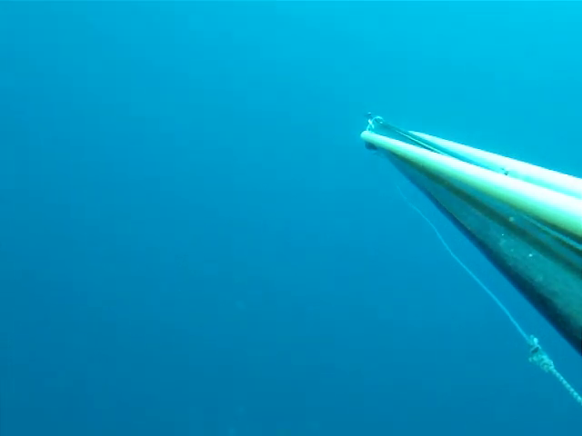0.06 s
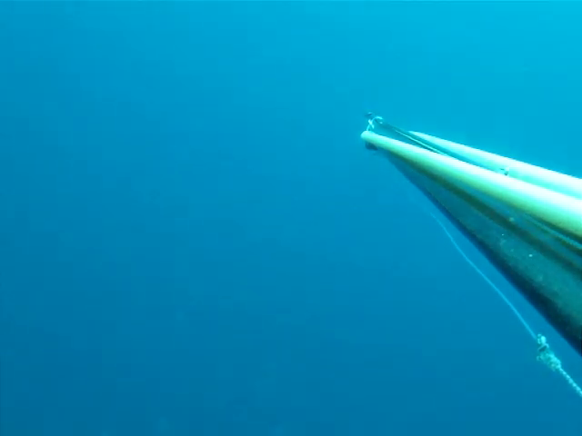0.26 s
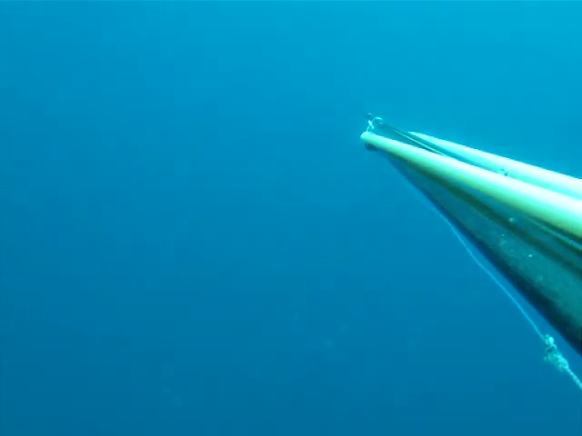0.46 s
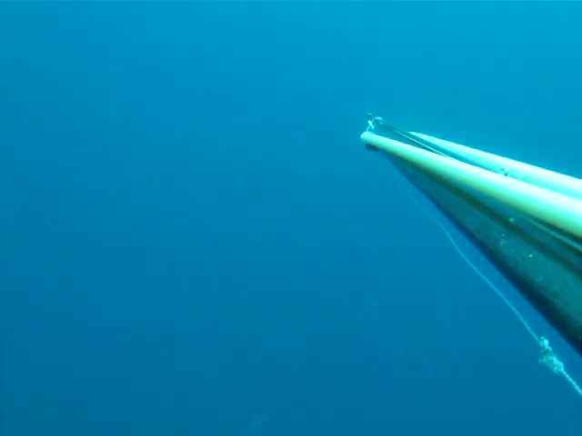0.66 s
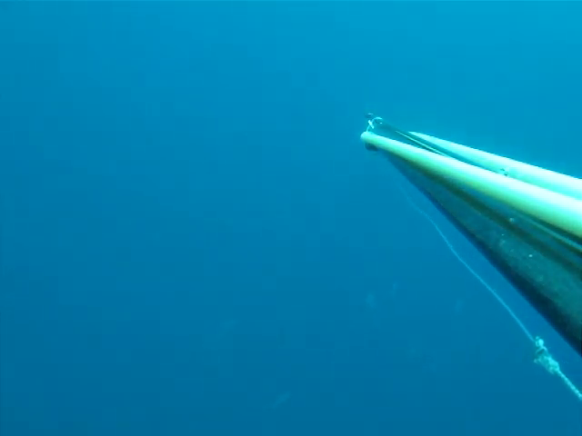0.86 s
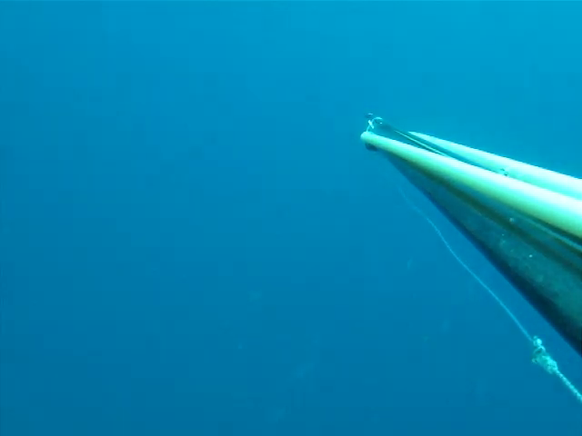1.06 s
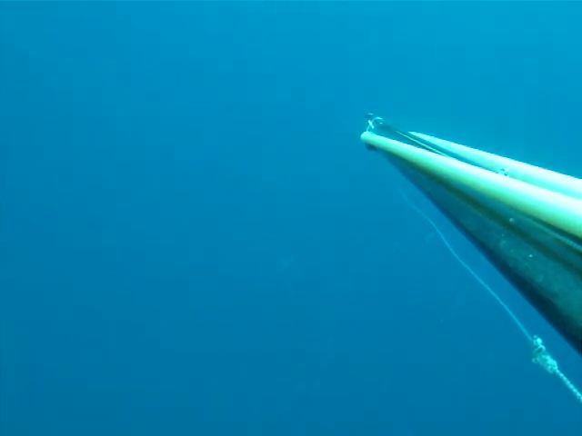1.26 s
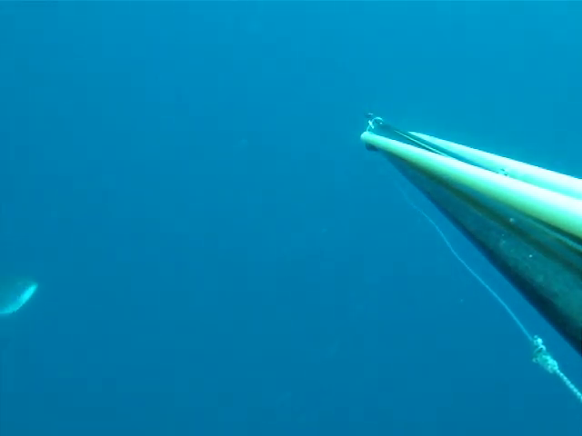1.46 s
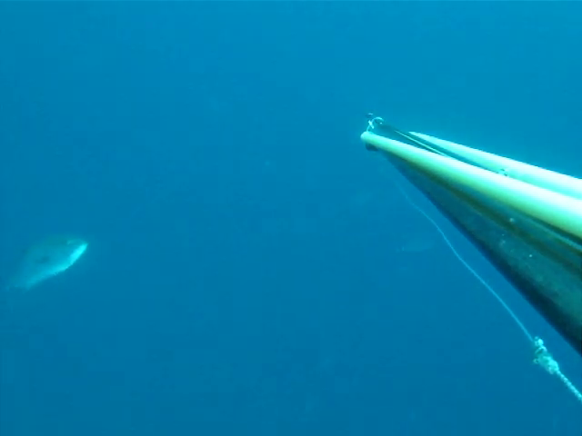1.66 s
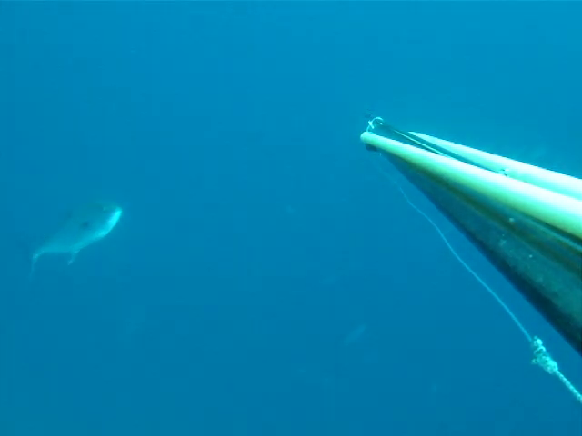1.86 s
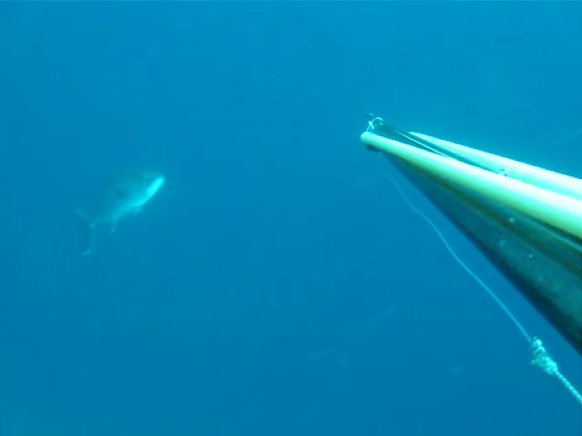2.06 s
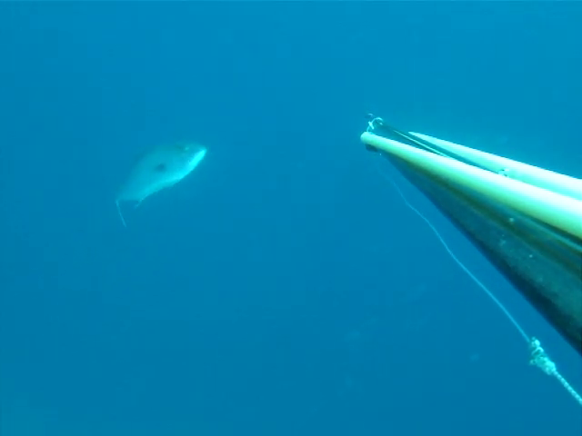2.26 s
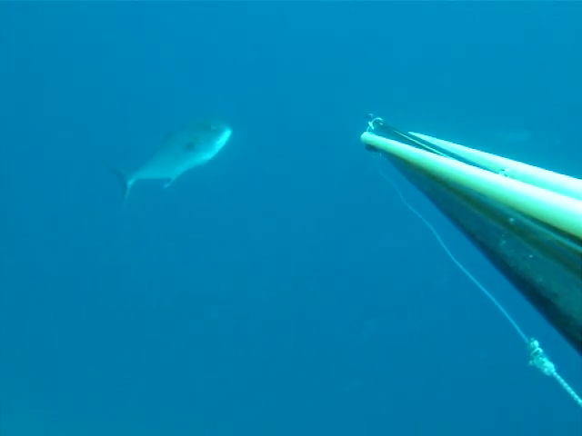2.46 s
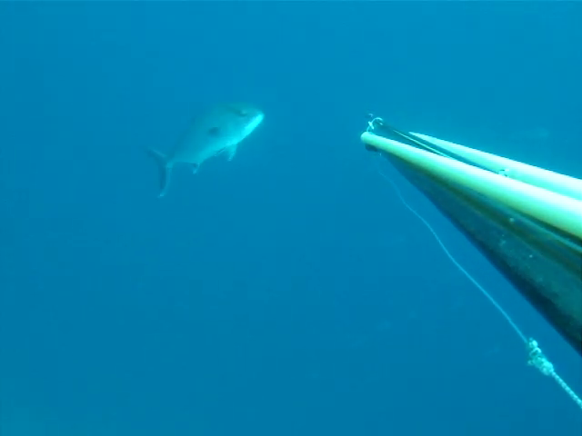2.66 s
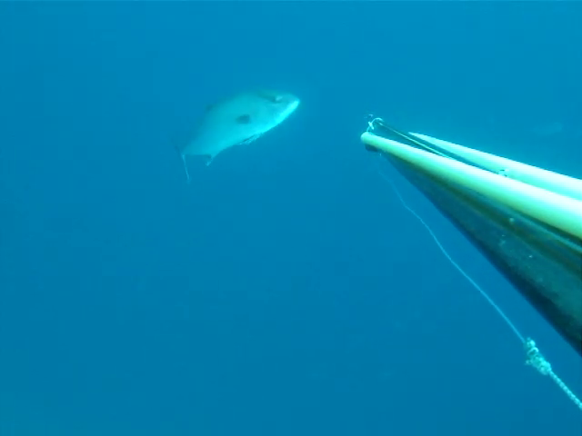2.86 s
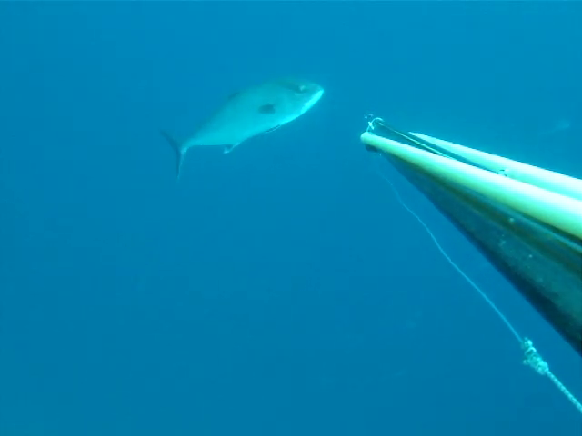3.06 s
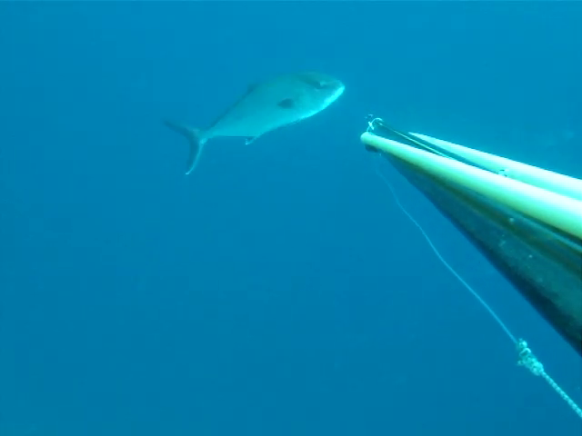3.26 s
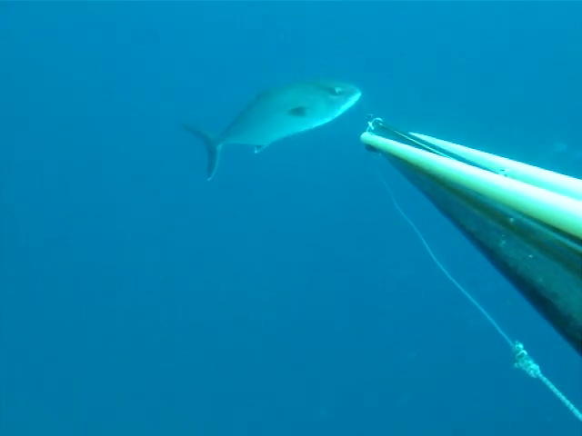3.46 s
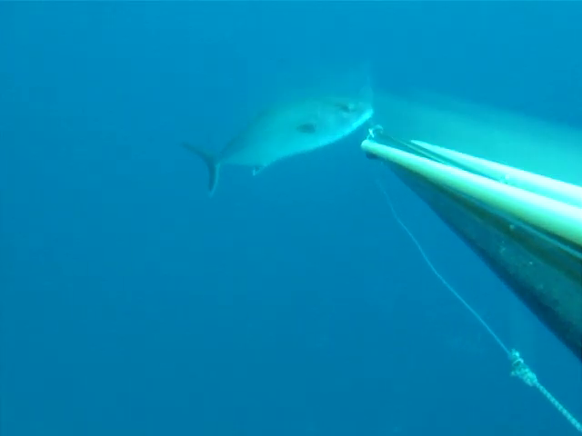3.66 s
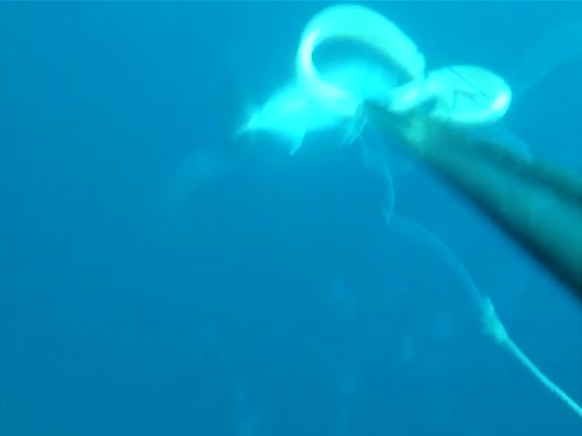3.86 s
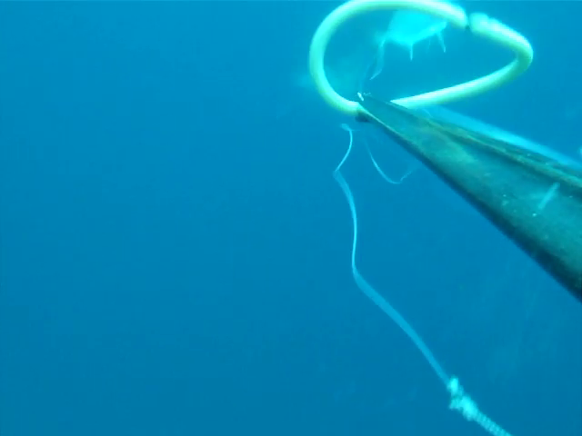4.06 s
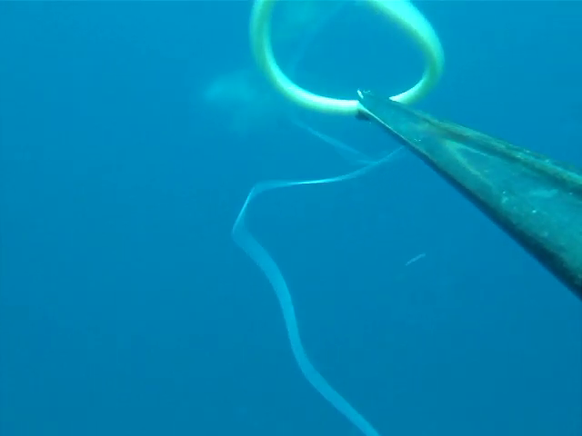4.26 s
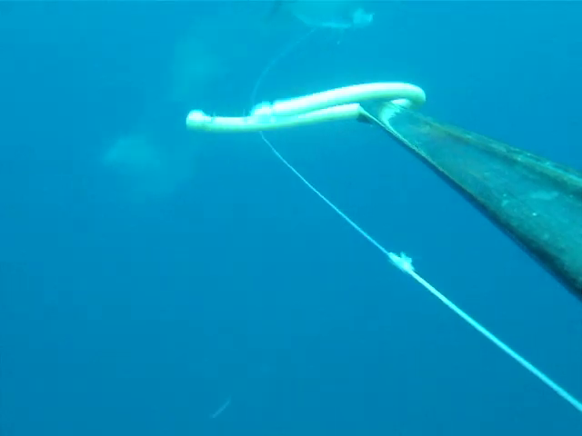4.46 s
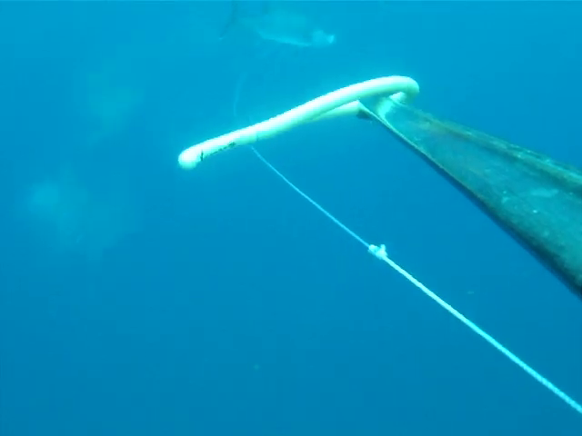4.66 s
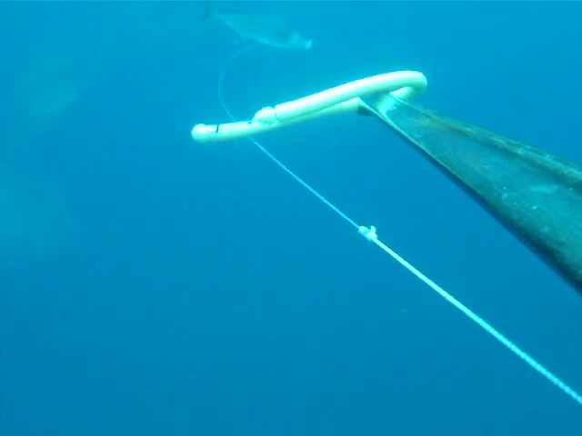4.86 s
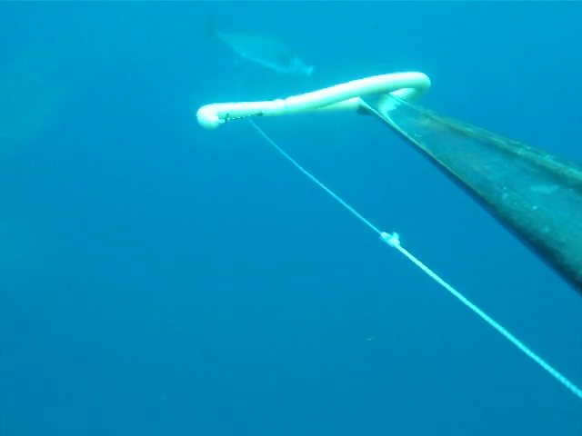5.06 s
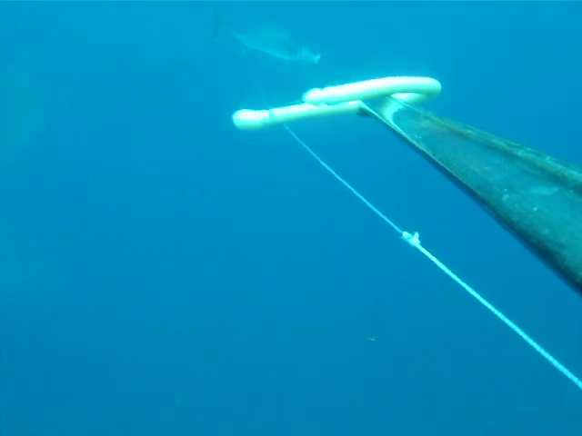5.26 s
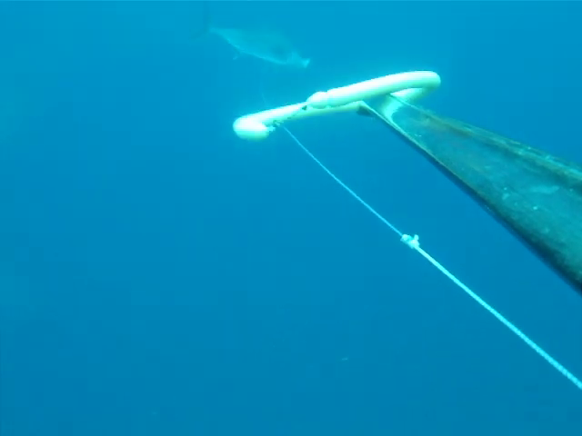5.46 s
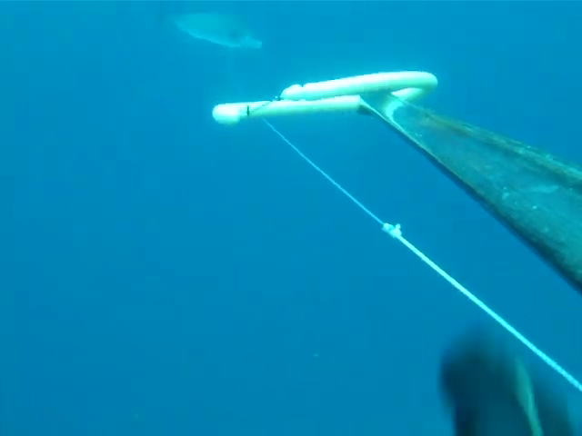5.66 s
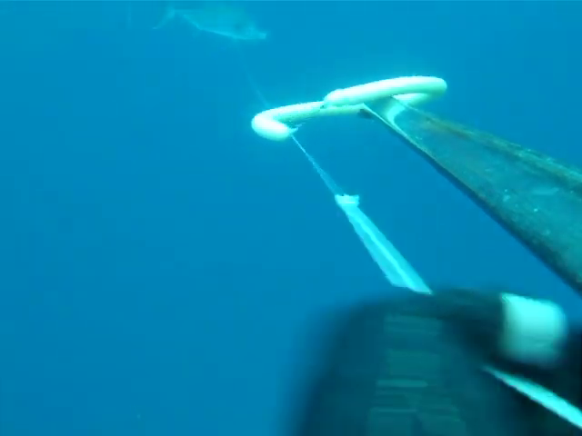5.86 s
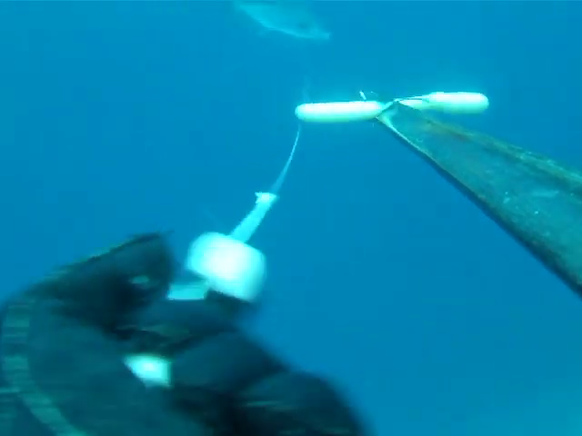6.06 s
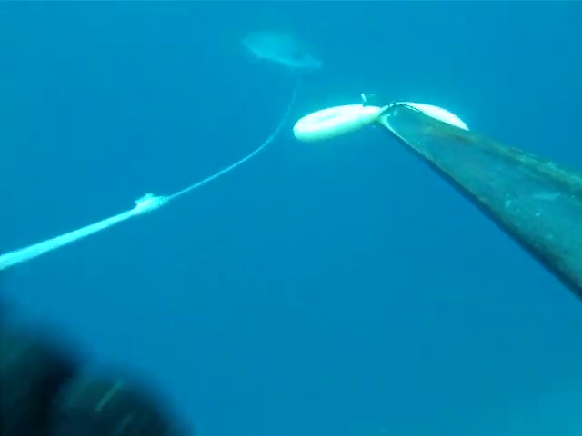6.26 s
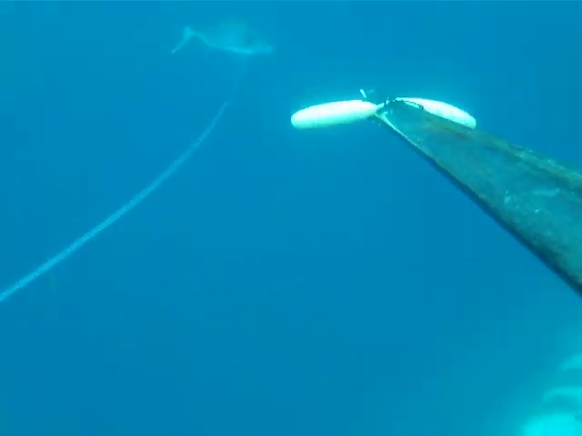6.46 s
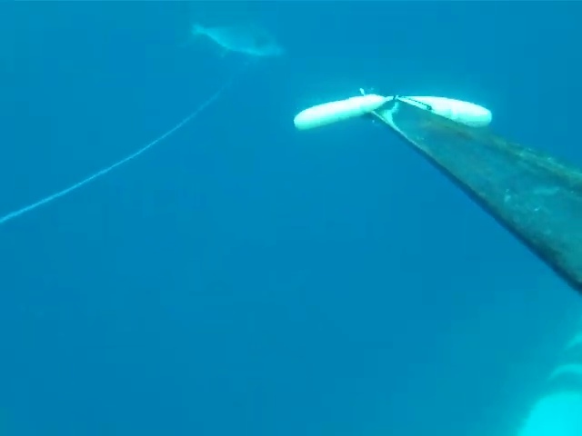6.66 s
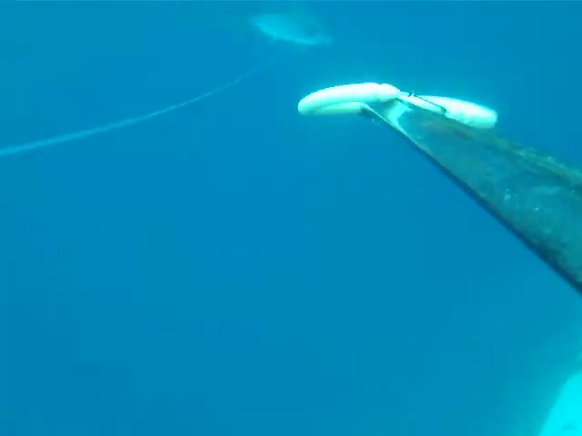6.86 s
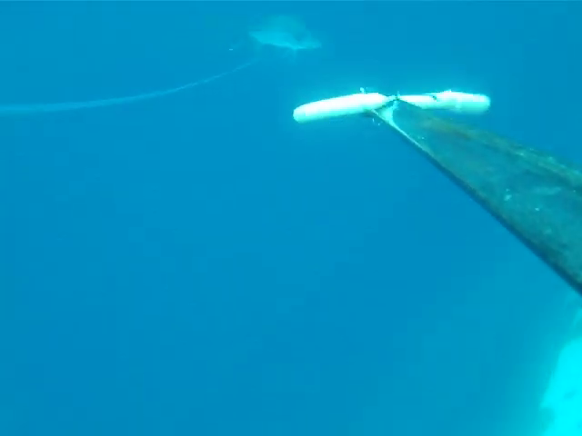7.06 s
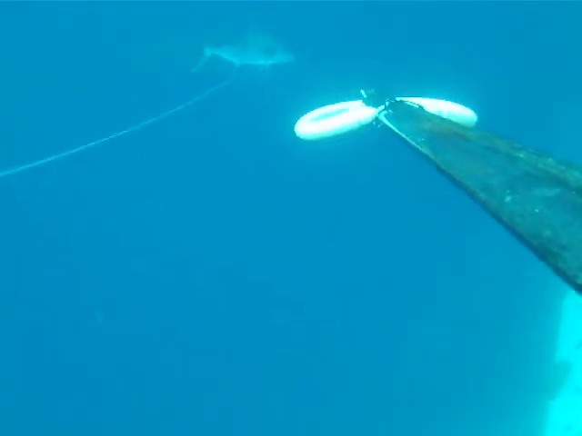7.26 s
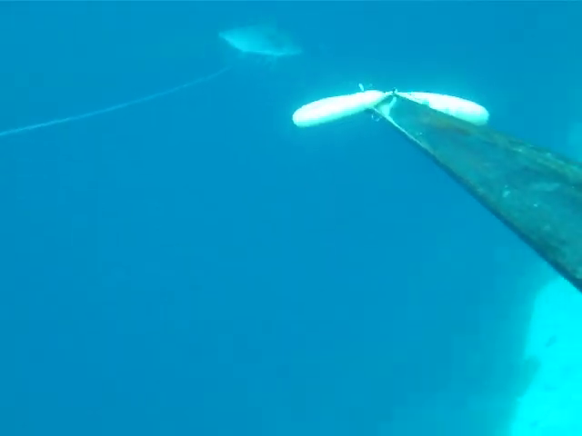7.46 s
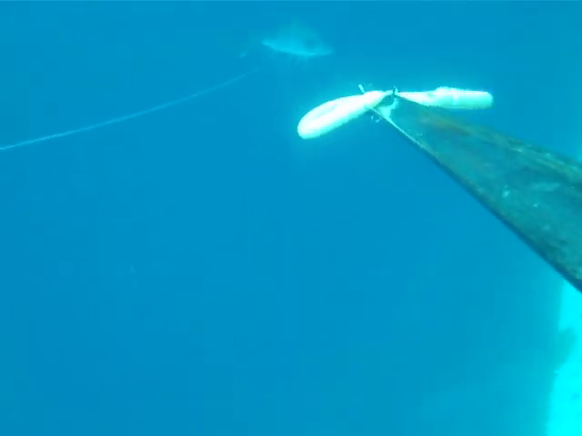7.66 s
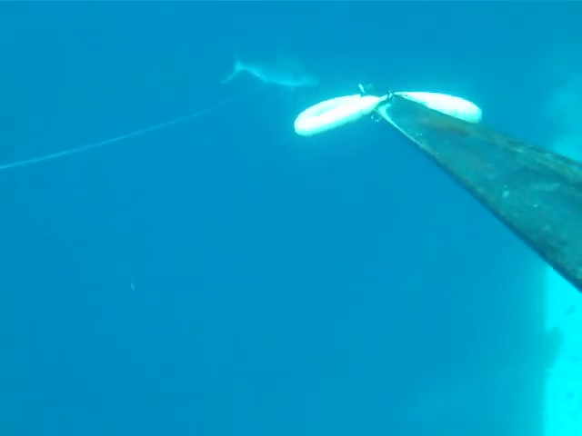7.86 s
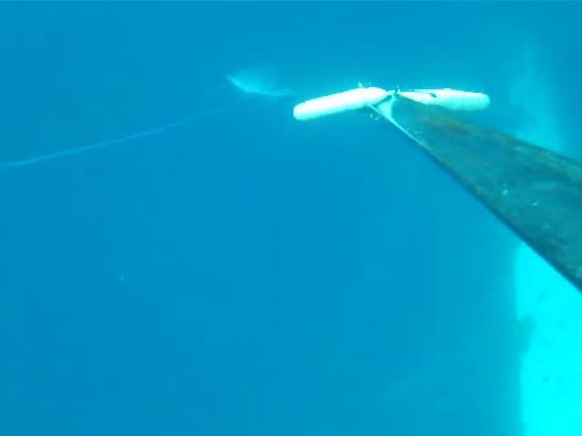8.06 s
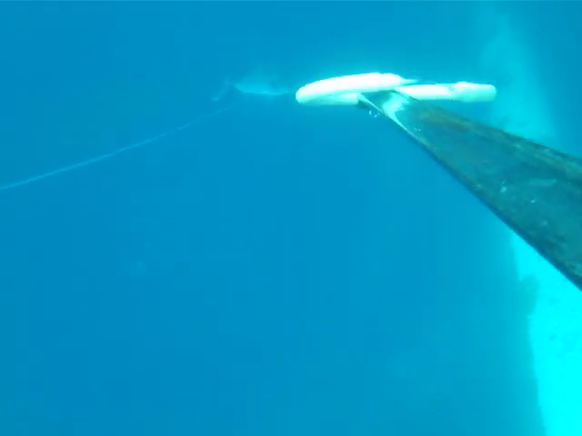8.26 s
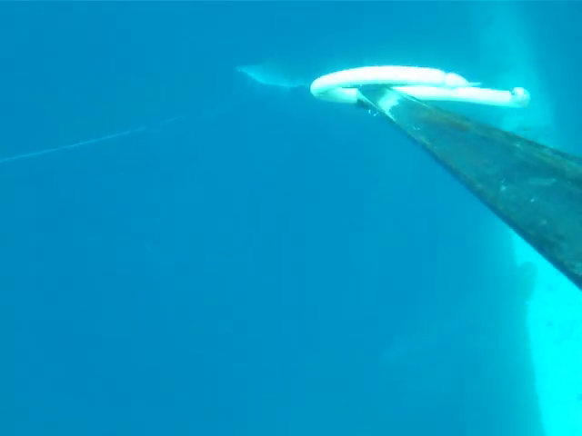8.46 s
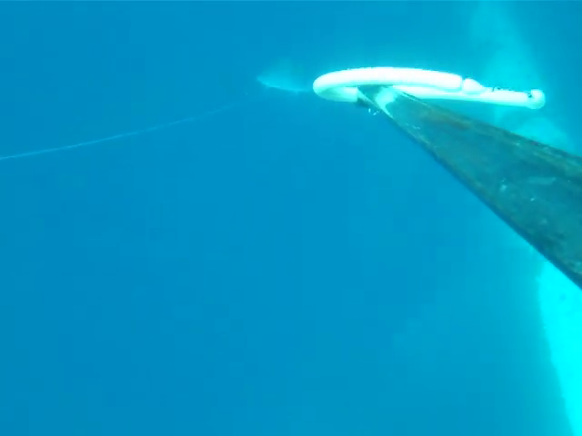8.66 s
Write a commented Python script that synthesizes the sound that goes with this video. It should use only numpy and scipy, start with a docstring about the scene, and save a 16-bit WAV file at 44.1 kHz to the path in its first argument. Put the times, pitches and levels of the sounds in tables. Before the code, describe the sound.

Underwater, with a dull narrow-band microphone mounted on the gun: near silence over low hiss and thin whine, broken by soft knocks and a bright mechanical click. A hard, clipping shot booms and quickly decays into rumble and slapping. A later bright clack brings rattling and fading rubbing. Then hand and line bump the barrel, followed by bouts of low groaning buzz, small squeaks, dull taps and clicks to the end.

```python
"""A band-powered speargun fires under water, heard through a sealed housing fixed to the gun.
Catch, shot, slapping bands, the line jerking tight and rubbing: noise forces ring the same barrel modes.
Ticks, ringing parts and the slow recoil swing are dying sines; the taut line hums and squeaks as near-sines.
A low rumble of churned water follows the shot; hiss and thin whines lie under it all.
The recoil overloads the recorder, which clips hard."""
import sys
import numpy as np
from scipy import signal
from scipy.fft import rfft, irfft
from scipy.io import wavfile
from scipy.ndimage import uniform_filter1d

SR = 44100
rng = np.random.default_rng(int(sys.argv[2]) if len(sys.argv) > 2 else 0)


def output_pcm(signal):
    """Save a mono or channel-first signal as 16-bit PCM at the path in sys.argv[1].

    Samples are clipped to [-1, 1] before scaling.
    """
    pcm = np.clip(np.atleast_2d(signal).T, -1, 1) * 32767
    wavfile.write(sys.argv[1], SR, np.round(pcm).astype(np.int16))


N = 384895


def amp(db):
    """Gain of a level in dB."""
    return 10 ** (np.asarray(db) / 20)


def rms_one(x):
    """Scaled to rms 1."""
    return x / np.sqrt(np.mean(x ** 2) + 1e-20)


def above(x, hz):
    """Fourth-order high-pass."""
    return signal.sosfilt(signal.butter(4, hz, "high", fs=SR, output="sos"), x)


def stretch(rows):
    """Sample range of a curve table and its columns interpolated over that range."""
    s, *columns = np.transpose(rows)
    at = np.arange(round(s[0] * SR), min(round(s[-1] * SR), N))
    return at, [np.interp(at / SR, s, column) for column in columns]


def drift(rate_hz):
    """Slow chance: noise twice through a one-pole low-pass; rms 1."""
    r = np.exp(-2 * np.pi * rate_hz / SR)
    slow = signal.lfilter([1], [1, -2 * r, r * r], rng.standard_normal(N + SR))
    return rms_one(slow[SR:])  # filter start-up dropped


def body(x, modes):
    """Parallel resonances with alternating signs; noise of rms 1 comes out near rms 1."""
    out, power = 0, 0
    for k, (hz, width_hz, db) in enumerate(modes):
        r = np.exp(-np.pi * width_hz / SR)
        b = amp(db) * (-1) ** k * (1 - r * r) / 2 * np.array([1, 0, -1])
        a = [1, -2 * r * np.cos(2 * np.pi * hz / SR), r * r]
        out = out + signal.lfilter(b, a, x + 1e-18)
        power += amp(2 * db) * np.pi * width_hz / SR
    return out / np.sqrt(power)


# Hiss spectrum: (frequency [Hz], relative density [dB per Hz])
HISS_SPECTRUM = [(8.8, -28.5), (15, 1.5), (49, -18), (87, -15.5), (340, -17.5), (399, -16.5), (444, -19),
                 (1130, -22), (3460, -24), (3950, -24), (7110, -24), (7910, -22.5), (8800, -15),
                 (11400, -77), (19400, -120)]
# Electronics whine: (frequency [Hz], level [dB rms])
WHINE_TONES = [(3047, -73), (3871, -70), (3989, -72), (4021, -70), (7827, -74), (7860, -66), (7887, -67),
               (7919, -75), (8113, -70), (8140, -70)]
HISS_DB_RMS = -51


def recorder_noise():
    """Noise shaped by a smooth spectrum, plus steady thin tones."""
    hz, db = np.transpose(HISS_SPECTRUM)
    grid_hz = np.maximum(np.fft.rfftfreq(N, 1 / SR), 1)
    gain = amp(np.interp(np.log(grid_hz), np.log(hz), db))
    hiss = irfft(rfft(rng.standard_normal(N)) * gain, N)
    t = np.arange(N) / SR
    whine = np.zeros(N)
    for tone_hz, tone_db in WHINE_TONES:
        whine += np.sqrt(2) * amp(tone_db) * np.sin(2 * np.pi * (tone_hz * t + rng.random()))
    return amp(HISS_DB_RMS) * rms_one(hiss) + whine


WASH_S, WASH_DB_RMS, WASH_T60_S, WASH_BAND_HZ = 3.735, -18.5, 0.38, [25, 112]  # level at onset


def wash():
    """Churned water round the housing: low band noise dying after the shot."""
    age = np.arange(N) / SR - WASH_S
    band = signal.butter(2, WASH_BAND_HZ, "band", fs=SR, output="sos")
    rumble = rms_one(signal.sosfilt(band, rng.standard_normal(N)))
    return rumble * amp(WASH_DB_RMS - 60 * np.maximum(age, 0) / WASH_T60_S) * (age > 0)


# Line squeaks: (start [s], fastest [s], end [s], top pitch [Hz], level at rest pitch [dB rms])
LINE_SQUEAKS = [(5.955, 5.96, 6.01, 680, -41), (6.05, 6.09, 6.15, 730, -45), (6.39, 6.514, 6.62, 1136, -42),
                (6.655, 6.66, 6.75, 774, -39), (7.27, 7.362, 7.44, 1215, -39), (7.45, 7.544, 7.6, 628, -39),
                (8.06, 8.14, 8.19, 745, -44), (8.335, 8.34, 8.39, 800, -42)]
SQUEAK_REST_HZ, SQUEAK_DB_PER_OCTAVE, SQUEAK_ARCH_POWER = 520, -7, 1.7


def squeaks(waver, flutter_db):
    """The line squeaks higher the faster it slides: a near-sine on a pitch arch, unsteady in level."""
    out, unsteady, flutter = np.zeros(N), drift(45), drift(27)
    for start_s, fastest_s, end_s, top_hz, db in LINE_SQUEAKS:
        at, (away,) = stretch([(start_s, 1), (fastest_s, 0), (end_s, 1)])
        octaves = np.log2(top_hz / SQUEAK_REST_HZ) * (1 - away ** SQUEAK_ARCH_POWER)
        hz = SQUEAK_REST_HZ * 2 ** octaves * (1 + waver * unsteady[at])
        phase = 2 * np.pi * np.cumsum(hz) / SR
        level = amp(db + SQUEAK_DB_PER_OCTAVE * octaves + flutter_db * flutter[at])
        out[at] += np.sqrt(2) * level * np.sin(phase) * signal.windows.tukey(len(at), .2)
    return out


# The fish's pull on the line, four bouts of: (time [s], hum level before flutter [dB rms], mean pitch [Hz])
PULL_BOUTS = [
    [(5.94, -45.5, 388), (5.972, -42.5, 368.6), (5.998, -38, 413), (6.026, -20.5, 368),
     (6.054, -36.5, 387.5), (6.082, -28, 393), (6.102, -26, 342), (6.126, -31, 390.6), (6.164, -34.5, 377),
     (6.176, -35.5, 391), (6.202, -45.5, 394.6), (6.244, -38, 358), (6.256, -31.5, 333.5),
     (6.272, -32, 327), (6.29, -44, 366), (6.3, -35, 364)],
    [(6.3, -45, 393), (6.35, -33, 366.7), (6.364, -29.5, 413.5), (6.424, -36, 386), (6.5, -26, 360),
     (6.518, -28, 391.6), (6.586, -32.5, 411.7), (6.728, -27.5, 375.4), (6.766, -39, 395),
     (6.83, -40, 366.7), (6.844, -31.5, 329), (6.88, -45, 411), (6.912, -45.5, 337), (6.942, -49, 390.5),
     (6.988, -69.5, 328), (7.05, -46, 406)],
    [(7.08, -50, 328.5), (7.122, -48, 319.6), (7.158, -38.5, 354), (7.176, -30, 409), (7.204, -29, 429.7),
     (7.268, -25.5, 381), (7.316, -26, 407), (7.366, -25, 401), (7.408, -32.5, 421), (7.462, -26, 407.4),
     (7.498, -29, 419), (7.528, -30, 380.4), (7.612, -29, 391.3), (7.626, -29.5, 350), (7.674, -38.5, 325),
     (7.72, -55, 320.4)],
    [(7.73, -40.5, 366.5), (7.784, -26.5, 347.7), (7.81, -40, 380.5), (7.828, -40, 341),
     (7.898, -31, 391.6), (7.956, -23.5, 389.6), (8.07, -37.5, 321.7), (8.132, -40.5, 372.8),
     (8.282, -38, 346.7), (8.348, -39.5, 392), (8.392, -29.5, 341.2), (8.472, -45.5, 349.6),
     (8.53, -46.5, 322.5), (8.564, -36.5, 409), (8.684, -44.5, 356), (8.728, -39, 394.5)],
]


def hum(waver, flutter_db):
    """The taut line hums against the barrel: a near-sine following the pull, unsteady in pitch and level."""
    out, unsteady, flutter = np.zeros(N), drift(49), amp(flutter_db * drift(25))
    for rows in PULL_BOUTS:
        at, (db, hz) = stretch(rows)
        phase = 2 * np.pi * np.cumsum(hz * (1 + waver * unsteady[at])) / SR
        out[at] = np.sqrt(2) * amp(db) * flutter[at] * np.sin(phase)
    return out


# Bands and line dragging after a jolt:
# (start [s], low force [dB rms], middle force [dB rms], high force [dB rms], t60 [s])
DRAGS = [(3.74, -60, -29, -35.5, 0.18), (3.8, -37.5, -53.5, -63, 5), (4.409, -22, -41, -54, 0.73),
         (4.41, -42, -66, -70, 7.0), (5.598, -41.5, -50.5, -70, 1.4), (5.799, -25, -39.5, -46.5, 0.32),
         (5.905, -28, -48, -56, 0.25)]
# Line scraping across the barrel: (start [s], length [s], middle force [dB rms])
LINE_SCRAPES = [(4.444, 0.05, -50), (4.473, 0.073, -41), (5.76, 0.045, -31.5), (6.452, 0.095, -44),
                (6.641, 0.026, -39.5), (6.825, .04, -42), (7.184, 0.097, -33), (7.373, 0.027, -37),
                (7.477, 0.094, -38.5), (7.775, 0.049, -41), (7.96, 0.084, -39.5), (8.003, 0.21, -44.5),
                (8.39, 0.053, -42)]
SCRAPE_HIGH_DB = -16.5  # re middle
# [middle, low, high] force at the mean pull; share of the pull's dB swing
RUB_DB_RMS, RUB_FOLLOWS, RUB_SMOOTH_S = [-49, -33.5, -54], [0.34, 0.68, 0.35], 0.092


def rubbing(lumpy_db, slips_hz):
    """Stick and slip: noise forces (middle, low, high) whose strength jumps about."""
    power, t = np.zeros((3, N)), np.arange(N) / SR
    for s, low_db, middle_db, high_db, t60_s in DRAGS:
        fade_db = 60 * np.maximum(t - s, 0) / t60_s
        power += (t > s) * amp(2 * (np.c_[[middle_db, low_db, high_db]] - fade_db))
    mean_db = np.mean([row[1] for rows in PULL_BOUTS for row in rows])
    for rows in PULL_BOUTS:
        at, (db, _) = stretch(rows)
        swing_db = uniform_filter1d(db, round(RUB_SMOOTH_S * SR), mode="nearest") - mean_db
        power[:, at] += amp(2 * (np.c_[RUB_DB_RMS] + np.c_[RUB_FOLLOWS] * swing_db))
    for s, length_s, db in LINE_SCRAPES:
        at, _ = stretch([(s,), (s + length_s,)])
        window = signal.windows.tukey(len(at), .5)
        power[::2, at] += amp(2 * np.c_[[db, db + SCRAPE_HIGH_DB]]) * window
    patches = amp(np.c_[lumpy_db] * drift(slips_hz))
    patches /= np.sqrt(np.mean(patches ** 2, axis=1, keepdims=True))
    return np.sqrt(power) * rng.standard_normal((3, N)) * patches


# Small hard parts ticking: (time [s], level of lower modes [dB], level of upper mode [dB])
PART_TICKS = [(0.3804, -48, -39), (1.814, -49, -33), (1.8928, -49, -33.5), (2.198, -50, -35),
              (3.003, -43, -38), (3.243, -45, -35), (4.713, -49, -26), (4.9083, -51, -37),
              (5.015, -57, -42), (5.762, -26, -46), (6.229, -7, -11), (6.264, -46, -53), (8.212, -60, -32),
              (8.4195, -46, -30.5)]
# Tick modes: (frequency [Hz], t60 [s], gain on tick level [dB], level column [0 lower, 1 upper])
TICK_RESONANCES = [(2850, 0.0072, -0.5, 0), (3710, 0.0041, -2, 0), (6700, 0.0048, 1.5, 1)]


def ticks(bounce_ms, bounce_db):
    """One click and a weak bounce set short modes ringing."""
    s, *levels_db = np.transpose(PART_TICKS)
    out = np.zeros(N)
    for hz, t60_s, gain_db, column in TICK_RESONANCES:
        clicks = np.zeros(N)
        clicks[np.round(s * SR).astype(int)] = amp(gain_db + levels_db[round(column)])
        clicks += amp(bounce_db) * np.roll(clicks, round(bounce_ms * SR / 1000))
        r, w = amp(-60 / (t60_s * SR)), 2 * np.pi * hz / SR
        out += signal.lfilter([0, np.sin(w)], [1, -2 * r * np.cos(w), r * r], clicks + 1e-18)
    return above(out, 2150)


# Loose metal parts and recoil swing: (start [s], frequency [Hz], undecayed level [dB peak], t60 [s])
PART_RINGS = [(1.72, 1277, -37, 0.34), (1.723, 2430, -47, 0.21), (1.722, 4280, -59, 0.63),
              (3.724, 21.7, -2, 0.36), (3.766, 36, -23, 0.14), (3.801, 57, -29, 0.59),
              (3.95, 949, -52.5, 2), (5.512, 158, -30, 0.074)]
SHOCK_S, SHOCK_MS, SHOCK_DB_PEAK = 3.7243, 3.2, 1.5


def rings(rise_cycles):
    """Dying sines that start with a pressure drop, plus the released bands' kick on the housing."""
    t = np.arange(N) / SR
    shock_phase = np.clip((t - SHOCK_S) * 1000 / SHOCK_MS, 0, 1)
    out = -amp(SHOCK_DB_PEAK) * np.sin(np.pi * shock_phase) ** 2
    for s, hz, db, t60_s in PART_RINGS:
        age = np.maximum(t - s, 0)
        rise = 1 - np.exp(-age * hz / rise_cycles)
        out -= amp(db - 60 * age / t60_s) * rise * np.sin(2 * np.pi * hz * age)
    return out


KNOCK_HIGH_DB = -6.5  # high re middle, knocks and chatter
# Loose bands and fittings after the shot and the line snap: (start [s], first touch level [dB])
CHATTER_STARTS = [(3.78, -42.5), (4.41, -43)]
CHATTER_S, CHATTER_FADE_DB, CHATTER_SPREAD_DB = 0.46, 24, 4.5  # spread is +/-
CHATTER_RISE_MS, CHATTER_LOW_DB = 1.4, 3  # low re middle


def chatter(count):
    """Rows of small quick touches at chance moments and spots, fading out; columns as the clacks + thud Hz."""
    rows = []
    for s, db in CHATTER_STARTS:
        for late, spot, size in rng.random((count, 3)):
            mid_db = db - CHATTER_FADE_DB * late + CHATTER_SPREAD_DB * (2 * size - 1)
            rows.append((s + CHATTER_S * late, mid_db, mid_db + CHATTER_LOW_DB, mid_db + KNOCK_HIGH_DB,
                         900 * 4.0 ** spot, CHATTER_RISE_MS, 300 * 2.5 ** spot))
    return rows


# Catch, trigger and spear, line snapping tight: (time [s], middle force [dB], low force [dB],
# high force [dB], favoured pitch [Hz], nominal rise [ms])
HARD_CLACKS = [(1.699, -30, -52, -30, 1130, 3), (1.704, -20.5, -69, -23, 2150, 2),
               (1.71, -14.5, -47, -8.5, 1310, 0.47), (1.714, -14.5, -53, -18, 2500, 2.2),
               (1.727, -38, -68, -29, 1370, 3.3), (3.711, -33.5, -29, -32, 1710, 3.4),
               (3.724, -19.5, -24.5, -10, 1130, 2.5), (3.727, -17.5, -33, -11.5, 2180, 2.83),
               (3.763, -38, -41, -31.5, 1280, 3.7), (4.368, -31.5, -39, -26.5, 1780, 2.4),
               (4.374, -15.5, -46, -23, 2960, 5.9), (4.385, -25.5, -31, -27.5, 830, 4.9),
               (4.402, -29, -30.5, -29.5, 3110, 2.5), (4.446, -40, -42, -54, 2730, 4.7)]
# Bands, line and hand on the barrel: (time [s], low force [dB], middle force [dB], thud pitch [Hz])
DULL_KNOCKS = [(0.056, -46.5, -58, 530), (0.071, -47.5, -63, 510), (0.349, -45.5, -46.5, 474),
               (0.535, -49, -60, 540), (0.557, -49.5, -63, 600), (2.021, -54, -62, 412),
               (3.773, -24.5, -38, 550), (3.809, -39.5, -49, 430), (3.879, -38, -44.5, 623),
               (3.921, -47, -54, 610), (3.953, -40, -45, 600), (4.025, -51, -57, 400),
               (4.054, -39, -49, 464), (4.07, -39, -49, 346), (4.475, -25, -45, 437),
               (4.498, -43, -38.5, 450), (4.594, -41, -50, 450), (4.617, -37, -41, 480),
               (5.757, -16.5, -33, 410), (5.764, -16, -34, 593), (5.773, -19.5, -29, 395),
               (5.799, -35, -34, 350), (5.906, -37, -64, 310), (6.064, -34, -59, 706),
               (6.161, -35, -58, 700), (6.34, -41, -43.5, 399), (6.456, -29.5, -40.5, 400),
               (6.649, -27, -41, 680), (6.709, -28, -48, 526), (6.815, -31.5, -46, 375),
               (7.177, -33, -48, 657), (7.227, -28.5, -42, 435), (7.746, -32.5, -63, 400),
               (7.775, -28, -43, 326), (7.866, -35, -63, 594), (7.967, -34.5, -40.5, 380),
               (8.153, -42, -45, 643), (8.32, -31, -48, 400.9), (8.39, -33.5, -45, 374.8)]
CLACK_THUD_HZ, KNOCK_SPOT_HZ, KNOCK_RISE_MS = 412, 1100, 2.2
SPOT_WIDTH, THUD_WIDTH, THUD_DB = .45, .25, 0  # widths as share of pitch
LOW_RISE_FACTOR = 2.4
BURST_SAMPLES = 4000


def blows():
    """Each blow is a noise burst of uneven contacts that swells and dies: forces on middle, low, high modes."""
    rows = [(*row, CLACK_THUD_HZ) for row in HARD_CLACKS]
    for s, low_db, mid_db, thud_hz in DULL_KNOCKS:
        rows.append((s, mid_db, low_db, mid_db + KNOCK_HIGH_DB, KNOCK_SPOT_HZ, KNOCK_RISE_MS, thud_hz))
    rows += chatter(count=24)
    force = np.zeros((3, N))
    grits = rng.standard_normal((len(rows), 3, BURST_SAMPLES))
    for (s, *levels_db, spot_hz, ms, thud_hz), grit in zip(rows, grits):
        rise_ms = np.clip(ms * np.c_[[1, LOW_RISE_FACTOR, 1]], .3, 12)
        t = np.arange(BURST_SAMPLES) / (rise_ms * SR / 1000)
        shape = (t * np.exp(1 - t)) ** 2
        spot = body(grit[0], [(spot_hz, SPOT_WIDTH * spot_hz, 0)])  # spot struck favours nearby modes
        thud = grit[1] + amp(THUD_DB) * body(grit[1], [(thud_hz, THUD_WIDTH * thud_hz, 0)])
        burst = np.array([spot, thud, grit[2]]) * shape
        shape_energy = np.sum(shape ** 2, axis=1, keepdims=True)
        burst *= np.sqrt(shape_energy / np.sum(burst ** 2, axis=1, keepdims=True))
        i = round(s * SR)
        force[:, i:i + BURST_SAMPLES] += (amp(levels_db)[:, None] * burst)[:, :N - i]
    return force


# Barrel and housing modes, each table: (frequency [Hz], width [Hz], relative gain [dB])
BARREL_LOW = [(283, 335, -13.5), (292.2, 172, -3.5), (394.5, 83.6, -3), (521, 258, -10), (668, 264, -12.5)]
BARREL_MIDDLE = [(912, 80, 7.5), (1154, 328, 7), (1385, 554, 6), (1968, 128, 7.5), (2505, 500, -5),
                 (2716, 50, 5.5), (2900, 210, -13)]
BARREL_HIGH = [(3630, 1860, -12), (5780, 570, -9), (6010, 140, -6), (7060, 460, -4)]
BRIGHT_FROM_HZ, LOW_FROM_HZ = 640, 160
SWAY_HZ, SWAY_WIDTH_HZ, SWAY_DB = 30, 65, -25


def barrel(force):
    """Forces ring the low, middle and high modes; the whole housing sways with the low force."""
    middle, low, high = force
    bright = above(body(middle, BARREL_MIDDLE) + body(high, BARREL_HIGH), BRIGHT_FROM_HZ)
    sway = amp(SWAY_DB) * body(low, [(SWAY_HZ, SWAY_WIDTH_HZ, 0)])
    return above(body(low, BARREL_LOW), LOW_FROM_HZ) + sway + bright


def scene():
    """Noise, water and line under the gun, whose forces share one set of modes."""
    background = recorder_noise() + wash()
    line = squeaks(waver=.04, flutter_db=4.5) + hum(waver=.035, flutter_db=3.2)
    force = rubbing(lumpy_db=[2.5, 1.5, 2.5], slips_hz=28) + blows()
    gun = barrel(force) + ticks(bounce_ms=.8, bounce_db=-16) + rings(rise_cycles=0.23)
    return (background + line + gun)[None]


MIC_STOP_HZ, CUTOFF_STOP_HZ = 9000, 16640
OVERLOAD, OFFSET = .71, -.0024  # full scale = 1


def record(dry):
    """Narrow microphone band, hard overload, small offset, steep cut-off."""
    mic = signal.cheby2(14, 60, MIC_STOP_HZ, fs=SR, output="sos")
    clipped = np.clip(signal.sosfilt(mic, dry), -OVERLOAD, OVERLOAD)
    cutoff = signal.cheby2(12, 70, CUTOFF_STOP_HZ, fs=SR, output="sos")
    return signal.sosfilt(cutoff, clipped + OFFSET)


dry = scene()
out = record(dry)
output_pcm(out)
```